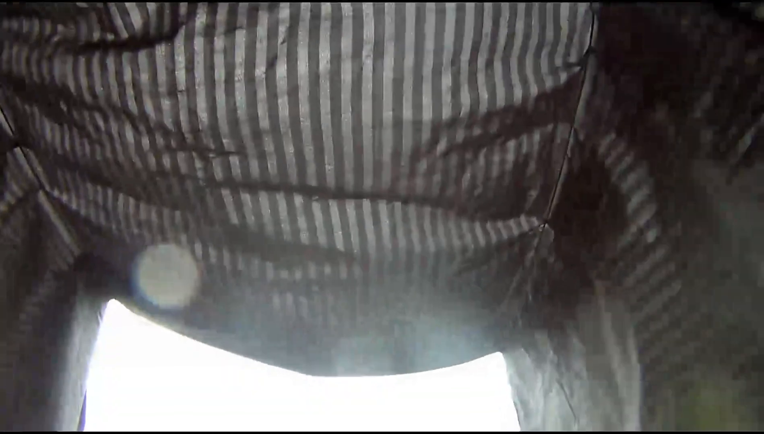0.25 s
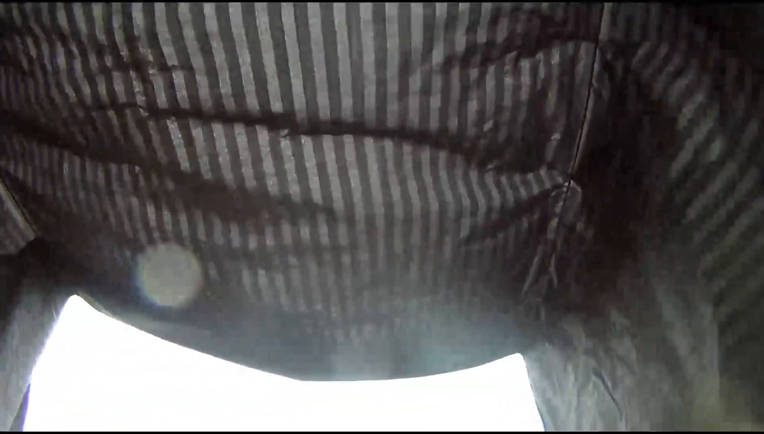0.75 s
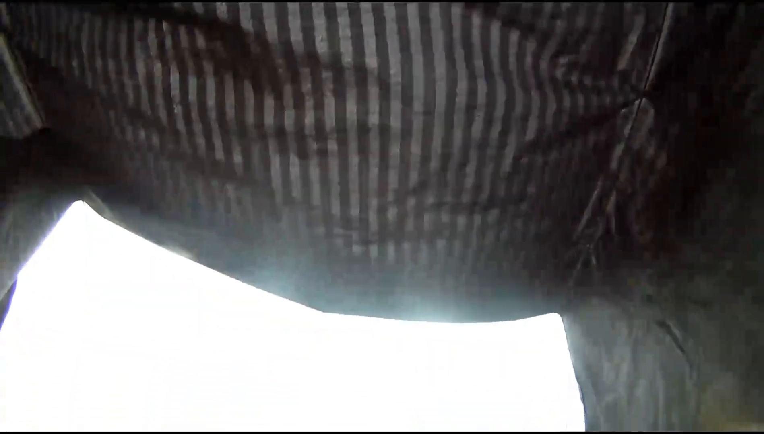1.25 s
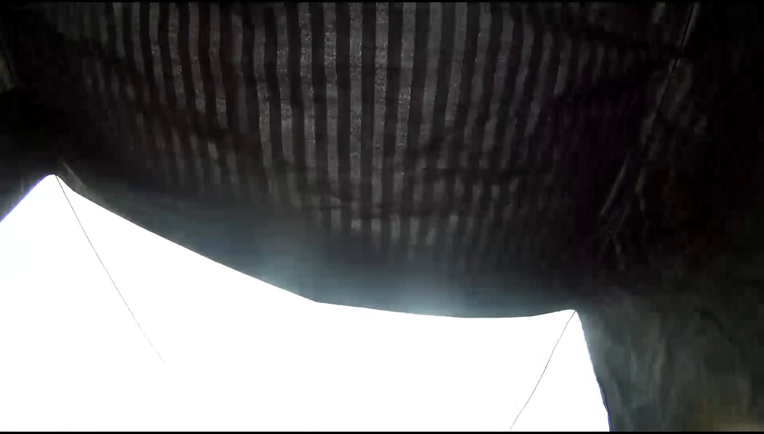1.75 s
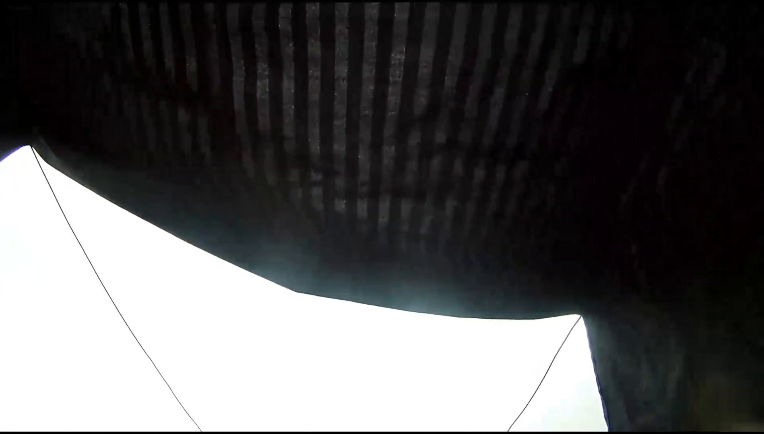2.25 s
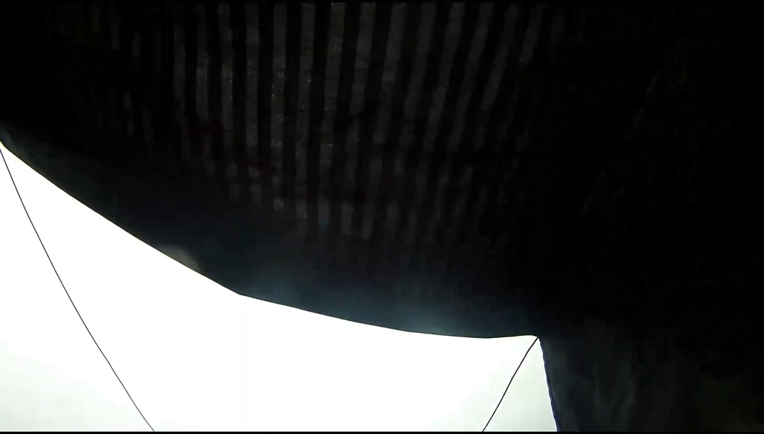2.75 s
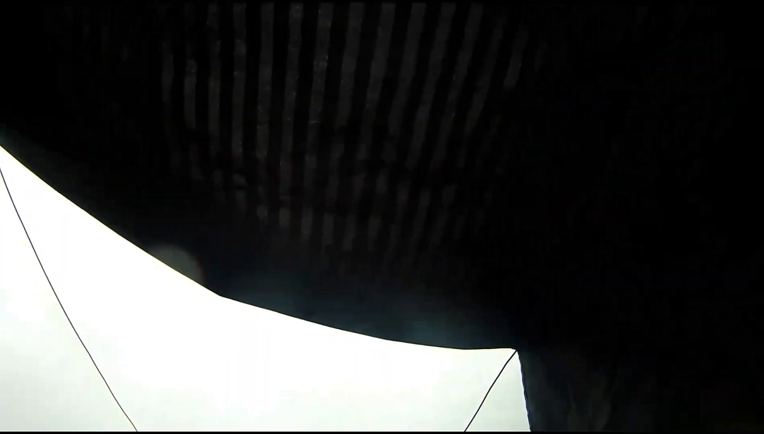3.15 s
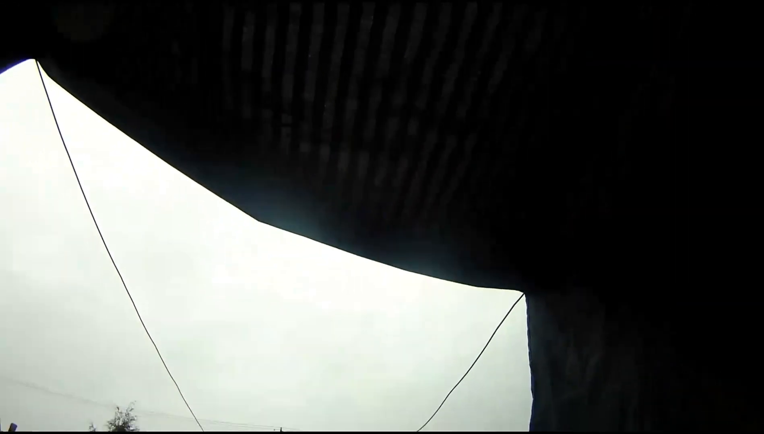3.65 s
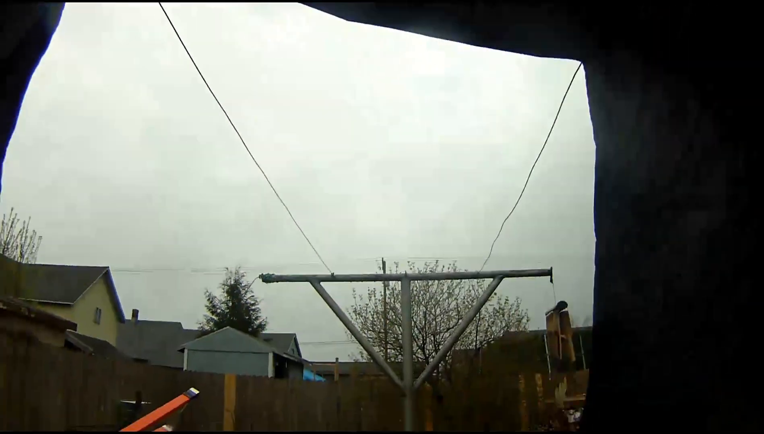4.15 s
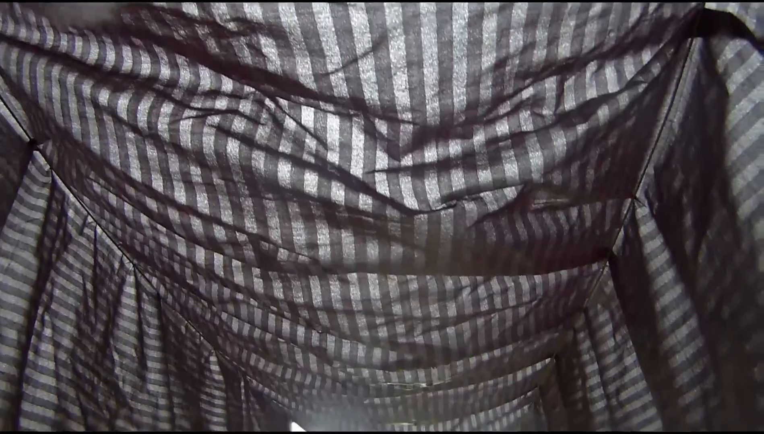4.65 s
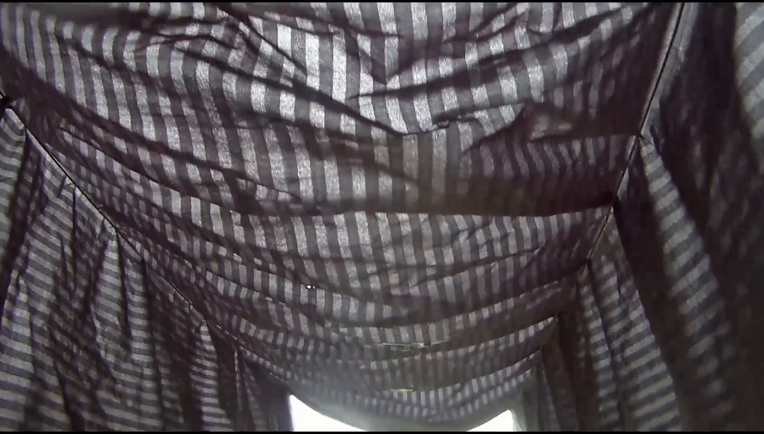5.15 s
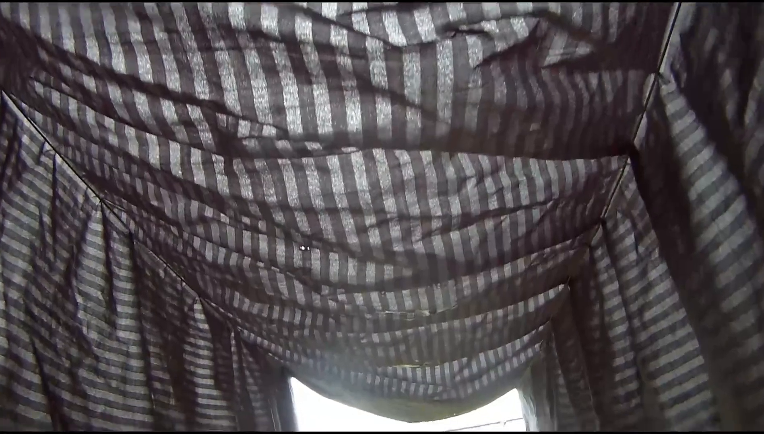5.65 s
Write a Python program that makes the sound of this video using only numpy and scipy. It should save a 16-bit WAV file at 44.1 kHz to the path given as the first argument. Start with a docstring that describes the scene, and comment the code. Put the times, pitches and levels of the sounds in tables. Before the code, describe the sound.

Steady rain patters on a cloth tarp overhead, interrupted halfway by a brief rub and a sharp tap on the microphone.

```python
"""In a yard, under a cloth tarp in steady rain: near drops tick and the rest of the sheet patters.
Each drop slaps the wet cloth, makes it sag and throws off droplets; the yard beyond is a smooth wash.
Halfway through, something rubs the microphone's casing and taps it with a bright, ringing snap.
The sound cuts out for an instant, cloth rustles close by, and the rain comes back a little softer.
Air rumbles faintly throughout, and a low hum, perhaps a far engine, comes up at the end."""
import sys
import numpy as np
from scipy import signal
from scipy.fft import rfft, irfft, next_fast_len
from scipy.io import wavfile

SR = 44100
rng = np.random.default_rng(int(sys.argv[2]) if len(sys.argv) > 2 else 0)


def inscribe(sig):
    """Save sig as 16-bit PCM at rate SR to the path in sys.argv[1].

    A 1-D sig is mono; a 2-D sig holds one channel per row.
    Samples are clipped to [-1, 1] before scaling.
    """
    pcm = np.round(np.clip(np.atleast_2d(sig).T, -1, 1) * 32767)
    wavfile.write(sys.argv[1], SR, pcm.astype(np.int16))


N = 260631
TIME = np.arange(N) / SR
CUT_FROM_S, CUT_TO_S, CUT_FADE_S = 4.442, 4.485, 0.0029  # the instant when the sound cuts out


def from_db(db):
    """Turn decibels into a number to multiply a sound by."""
    return 10 ** (np.asarray(db) / 20)


def rms_one(x):
    """Scale a sound so that its average strength (rms) is 1."""
    return x / np.sqrt(np.mean(x ** 2) + 1e-20)


def gain_curve(rows):
    """Join (time [s], level [dB]) points into a gain for every sample."""
    return from_db(np.interp(TIME, *np.transpose(rows)))


def colour(x, spectrum):
    """Shape a sound's bass and treble to follow (frequency [Hz], level [dB]) points."""
    size = 2 * next_fast_len(N // 2 + SR // 10)
    hz, db = np.transpose(spectrum)
    bin_hz = np.arange(size // 2 + 1) * SR / size
    log_gain = np.log(from_db(np.interp(np.log(bin_hz + 1), np.log(hz), db)))
    # a minimum-phase filter: it rings only after a click, never before
    cepstrum = irfft(log_gain)[:size // 2]
    cepstrum[1:] *= 2
    return irfft(rfft(x, size) * np.exp(rfft(cepstrum, size)))[:N]


def noise(spectrum):
    """Smooth noise with the given tone colour."""
    return rms_one(colour(rng.standard_normal(N), spectrum))


def grains(size, grit):
    """Noise with random spikes: more grit makes it rougher."""
    return rng.standard_normal(size) * np.exp(grit * rng.standard_normal(size))


def swell(at_s, half_s):
    """A bell-shaped rise and fall of height 1."""
    return np.exp(-.5 * np.minimum(((TIME - at_s) / half_s) ** 2, 100))


def cut_edge(at_s):
    """A quick, smooth step from 0 to 1 at one end of the cut."""
    return .5 + .5 * np.sin(np.pi * np.clip((TIME - at_s) / CUT_FADE_S, -.5, .5))


def struck(modes, at_s):
    """A struck object rings with several tones, each fading by 60 dB in its ring time."""
    age = np.maximum(TIME - at_s, 0)
    return sum(from_db(db - 60 * np.minimum(age / ring_s, 3)) * np.sin(2 * np.pi * hz * age)
               for hz, db, ring_s in modes)


# tone colour of the rumbling air: (frequency [Hz], relative level [dB])
AIR_COLOUR = [(12, 2), (25, -4.5), (45, -2), (65, 0), (110, -2.5), (170, -9.5), (300, -20.5), (700, -47.5)]
def air_rumble(level_db=-52.5, turn_db=1.5, after_cut_db=-1.5):
    """Air rumbles on the microphone, more while it is turned towards the open side."""
    turn = turn_db * swell(at_s=3.9, half_s=0.43)
    return from_db(level_db + turn + after_cut_db * cut_edge(CUT_TO_S)) * noise(AIR_COLOUR)


# the far engine, faint at first and then louder: (time [s], level [dB])
ENGINE_LEVELS = [(2.4, -75), (2.7, -57.5), (5.4, -59.5), (5.65, -48.5)]
def far_engine(pitch_hz=66, waver_radians=.25, wavers_per_s=10):
    """A far engine hums on one low, unsteady note."""
    moments = np.arange(0, N / SR + 1, 1 / wavers_per_s)
    waver = waver_radians * np.interp(TIME, moments, rng.standard_normal(len(moments)))
    return gain_curve(ENGINE_LEVELS) * np.sqrt(2) * np.sin(2 * np.pi * pitch_hz * TIME + waver)


# how hard it rains: (time [s], level [dB])
SHOWER_LEVELS = [(0, -52), (.8, -49), (1.23, -53.5), (1.7, -50.5), (1.92, -53.5), (2.4, -51), (3.5, -53),
                 (4.4, -49.5), (4.55, -48.5)]
def shower():
    """The rain grows and eases a little, on yard and tarp alike."""
    return gain_curve(SHOWER_LEVELS)


# tone colour of rain on the yard: (frequency [Hz], relative level [dB])
YARD_COLOUR = [(100, 3.5), (280, 8), (470, 5.5), (520, 9.5), (580, 2.5), (1200, -0.5), (2300, -6),
               (4500, -7), (8000, -18), (15000, -37)]
def yard_wash(relative_db=-5.5):
    """Countless drops out in the yard blur into a smooth wash."""
    return from_db(relative_db) * shower() * noise(YARD_COLOUR)


# soft rustles of cloth close by: (time [s], half length [s], level [dB])
CLOTH_RUSTLES = [(4.44, 0.0093, -47.5), (4.493, 0.019, -44), (5.728, 0.039, -45)]
# their tone colour: (frequency [Hz], relative level [dB])
RUSTLE_COLOUR = [(500, -11), (2500, -3.5), (4500, 3.5), (7500, 1), (10000, -16), (15000, -17)]
def cloth_rustles():
    """Threads slip over one another in a grainy swish."""
    swish = rms_one(colour(grains(N, grit=0.51), RUSTLE_COLOUR))
    return swish * sum(from_db(db) * swell(at_s, half_s) for at_s, half_s, db in CLOTH_RUSTLES)


# tone colour of the shaking casing: (frequency [Hz], relative level [dB])
SHAKE_COLOUR = [(15, -13.5), (35, 10), (70, -0.5), (110, -3.5), (200, -18), (500, -55)]
def casing_shake():
    """The microphone's casing rumbles while it is handled."""
    return from_db(-41) * swell(at_s=3.13, half_s=0.091) * noise(SHAKE_COLOUR)


# tone colour of the scraped casing, with two sharp peaks: (frequency [Hz], relative level [dB])
RASP_COLOUR = [(200, -11.5), (1000, -8), (1800, -7.5), (2400, -13), (3100, -6.5), (4200, -0.5),
               (4700, -5.5), (5030, 10.5), (5450, 0), (6550, -3), (6950, 8), (7400, -2.5), (10500, -26.5),
               (15000, -25.5)]
def casing_rasp():
    """The gritty noise of friction on the casing, used by both rubs and taps."""
    return rms_one(colour(grains(N, grit=.4), RASP_COLOUR))


# rubs on the casing: (time [s], half length [s], relative level [dB])
CASING_RUBS = [(3.032, 0.0071, -39.5), (3.061, 0.0045, -33), (3.113, .0035, -35), (3.163, 0.0032, -32),
               (3.176, 0.0025, -19.5), (3.188, 0.0049, -19), (3.23, .003, -46)]
def casing_rubs(rasp):
    """Each rub is a short burst of friction."""
    return rasp * sum(from_db(db) * swell(at_s, half_s) for at_s, half_s, db in CASING_RUBS)


# tones of the hollow casing: (pitch [Hz], relative level [dB], ring time [s])
KNOCK_TONES = [(75, -13, 0.06), (176, -18.5, 0.0316), (300, -15, 0.019), (560, -11, 0.0052),
               (800, -9, .008), (970, -6.5, 0.011), (1850, -13.5, 0.0098), (2810, -17, 0.019)]
# bright tones of the snap: the casing's short, sharp peaks and a small hard part's longer ring
# (pitch [Hz], relative level [dB], ring time [s])
SNAP_TONES = [(1217, -24, .06), (1850, 7, .012), (3736, -1, .052), (4635, -14, .042), (5030, 20.5, .011),
              (5286, -17, .034), (6352, -16, .06), (6950, 13, .011), (7359, -12, .026), (8263, -6, .051)]
# two taps, with relative levels: (time [s], crack [dB], crack half length [s],
# air push [dB], push half length [s], knock [dB], snap [dB])
CASING_TAPS = [(3.1742, -14, .0005, -24, .0008, -3, -42), (3.1916, -1.5, .0009, -10, .0011, -9, -18)]
def casing_taps(rasp, push_lead_s=.0008, tail_db=-25, tail_s=.004, leak_hz=51):
    """A tap pushes air into the microphone, cracks, knocks the casing and rings with a bright snap."""
    cracks, thumps = np.zeros(N), np.zeros(N)
    for at_s, crack_db, crack_half_s, push_db, push_half_s, knock_db, snap_db in CASING_TAPS:
        tail = from_db(tail_db) * (TIME > at_s) * np.exp(-np.clip((TIME - at_s) / tail_s, 0, 20))
        cracks += from_db(crack_db) * (swell(at_s + crack_half_s, crack_half_s) + tail)
        thumps += from_db(push_db) * swell(at_s - push_lead_s, push_half_s)
        thumps -= from_db(knock_db) * struck(KNOCK_TONES, at_s)
        thumps += from_db(snap_db) * struck(SNAP_TONES, at_s)
    # slow pushes leak back out of the microphone's opening
    thumps = signal.lfilter(*signal.butter(2, leak_hz, "high", fs=SR), thumps)
    return thumps + cracks * rasp


def drop(hz, cycles, sag_hz=750, sag_s=0.00082, spatter_s=0.0056, size=400):
    """One drop: a slap that rings briefly, the slower sag of the cloth and a spatter of droplets."""
    t = np.arange(size) / SR
    tension, splash = np.exp(.3 * rng.standard_normal(2))
    slap = np.exp(-t * hz / max(cycles, .2)) * np.cos(2 * np.pi * hz * t)
    sag = from_db(-12) * np.exp(-t / sag_s) * np.cos(2 * np.pi * sag_hz * tension * t + .5)
    spatter = from_db(-21) * splash * np.exp(-t / spatter_s) * rms_one(grains(size, grit=0.46))
    pulse = slap + sag + spatter
    # the ripple comes back from the two nearest folds within a few milliseconds
    for fold, lag in enumerate(np.sort(rng.integers(size // 25, size // 2, 2))):
        pulse[lag:] += from_db(-9) / (1 + fold) * rng.choice([-1, 1]) * slap[:-lag]
    # big, low drops flatten more slowly, which dulls them
    dull_above_hz = 2.9 * hz
    pulse = signal.lfilter([1], [1, -np.exp(-2 * np.pi * dull_above_hz / SR)], pulse)
    return pulse / np.sqrt(np.sum(pulse ** 2) * 1000 / SR)  # the energy of one millisecond at rms 1


def ticks(rows):
    """Place single drops from rows of (time [s], level [dB], pitch [Hz], ring length [cycles])."""
    out = np.zeros(N + SR)
    for at_s, db, hz, cycles in rows:
        pulse = from_db(db) * drop(hz, cycles)
        start = max(int(at_s * SR) - np.argmax(pulse), 0)
        out[start:start + len(pulse)] += pulse
    return out[:N]


def patter(drops_per_s=1000, middle_hz=2100, cycles=0.6, radius_over_height=10.2, kinds=96):
    """Small drops land all over the sheet; the farther away they land, the quieter they are."""
    lands = np.flatnonzero(rng.random(N) < drops_per_s / SR)
    place, size_db = rng.random((2, N))[:, lands]
    kind = rng.integers(0, kinds, N)[lands]
    distance = np.sqrt(1 + place * radius_over_height ** 2)
    strength = from_db(size_db) / distance
    pitches = middle_hz * np.exp(0.49 * np.sqrt(3) * np.linspace(-1, 1, kinds))
    pulses = np.array([drop(hz, cycles * 2 ** rng.uniform(-1, 1)) for hz in pitches])
    sounds = strength[:, None] * pulses[kind]
    positions = lands[:, None] + np.arange(pulses.shape[1])
    return rms_one(np.bincount(positions.ravel(), sounds.ravel(), N)[:N])  # overlapping drops add up


def drips(drops_per_s=10, relative_db=11, spread_db=2.5, middle_hz=2080, octaves=0.92, ring_s=0.00026):
    """Medium drops land nearby at random, each with its own size and pitch."""
    lands = np.flatnonzero(rng.random(N) < drops_per_s / SR)
    size, pitch = rng.uniform(-1, 1, (N, 2))[lands].T
    hz = middle_hz * 2 ** (octaves * pitch)
    return ticks(zip(lands / SR, relative_db + spread_db * size, hz, ring_s * hz))


# the biggest drops: (time [s], relative level [dB], pitch [Hz], ring length [cycles])
OVERHEAD_DROPS = [(0.1647, -27, 1170, 0.67), (0.2281, -31.5, 1470, 0.16), (0.3407, -32, 2870, 0.48),
                  (0.5363, -34, 1880, 0.57), (0.9281, -36, 4460, 1.5), (1.1557, -31.5, 2950, .6),
                  (1.16, -34, 1580, 0.55), (1.2461, -34, 1060, 0.47), (1.3265, -31.5, 3030, 1.3),
                  (1.3748, -34.5, 1880, 0.18), (1.4617, -32, 3130, 0.51), (1.5924, -33.5, 2380, .6),
                  (1.98, -33.5, 1230, 0.16), (2.095, -33, 1280, 0.22), (2.1521, -33.5, 1330, 0.46),
                  (2.8484, -28.5, 1910, .2), (2.8576, -31.5, 2660, .65), (2.9004, -32, 1550, .3),
                  (3.3474, -35.5, 1330, 0.18), (3.5344, -35, 3000, 0.76), (3.7825, -32, 2150, 0.36),
                  (3.8112, -28.5, 3500, .9), (3.9497, -33, 920, 0.65), (3.9726, -29.5, 4130, 0.71),
                  (4.1179, -32.5, 1420, 0.16), (4.7313, -35.5, 1340, 1.1), (5.114, -37, 3900, .45),
                  (5.4731, -36, 2070, .25), (5.6423, -37, 1250, .55), (5.8969, -31, 1200, 0.45)]
def overhead_drops(boost_db=1):
    """Big drops hit the cloth right overhead and stand out as sharp ticks."""
    return from_db(boost_db) * ticks(OVERHEAD_DROPS)


# how well the wet cloth gives off low and high sounds: (frequency [Hz], gain [dB])
CLOTH_COLOUR = [(100, -8), (250, 4), (500, 0.5), (800, -1), (1200, -0.5), (2100, -1.5), (3400, 1),
                (4700, 1.5), (7000, 3.5), (8300, 5.5), (10500, 0.5), (12500, 1.5), (15000, -0.5)]
def rain_on_tarp(patter_db=1, after_cut_db=-2, treble_hz=1430, treble_loss=0.14, echo_s=.008, echo_db=-21):
    """Drops of all sizes sound through the wet cloth and echo off the ground."""
    big_drops = overhead_drops()
    smaller_drops = shower() * (from_db(patter_db) * patter() + drips())
    # after the cut the smaller drops are softer and the cloth sounds a little duller
    after_cut = cut_edge(CUT_TO_S)
    tarp = colour(big_drops + from_db(after_cut_db * after_cut) * smaller_drops, CLOTH_COLOUR)
    treble = signal.lfilter(*signal.butter(1, treble_hz, "high", fs=SR), tarp)
    tarp -= treble_loss * after_cut * treble
    echo = from_db(echo_db) * np.interp(TIME - echo_s, TIME, tarp, left=0)
    return tarp + echo


def scene(handling_db=1):
    """All the sounds meet at one microphone under the tarp."""
    rasp = casing_rasp()
    handling = from_db(handling_db) * (casing_shake() + casing_rubs(rasp) + casing_taps(rasp))
    background = far_engine() + air_rumble() + cloth_rustles() + yard_wash()
    return (background + handling + rain_on_tarp())[None]


# dips in the microphone's treble: (frequency [Hz], width [Hz], share taken out [0 to 1])
TREBLE_DIPS = [(5980, 2400, 0.92), (12030, 3140, 0.99)]
def record(dry, overload=0.78, cut_db=-28, after_cut_db=-1, top_hz=15450):
    """The microphone dulls two treble bands, overloads on the tap and loses the top;
    the sound breaks off for an instant."""
    for hz, width_hz, share in TREBLE_DIPS:
        band = signal.lfilter(*signal.iirpeak(hz, hz / width_hz, fs=SR), dry)
        dry = dry - share * band
    clipped = dry / (1 + (dry / overload) ** 4) ** .25  # rounds off the loudest peaks
    gone, back = cut_edge(CUT_FROM_S), cut_edge(CUT_TO_S)
    gain = from_db(cut_db * (gone - back) + after_cut_db * back)
    low_pass = signal.ellip(10, .2, 80, top_hz, fs=SR, output="sos")
    return signal.sosfilt(low_pass, clipped * gain)


dry = scene()
out = record(dry)
inscribe(out)
```